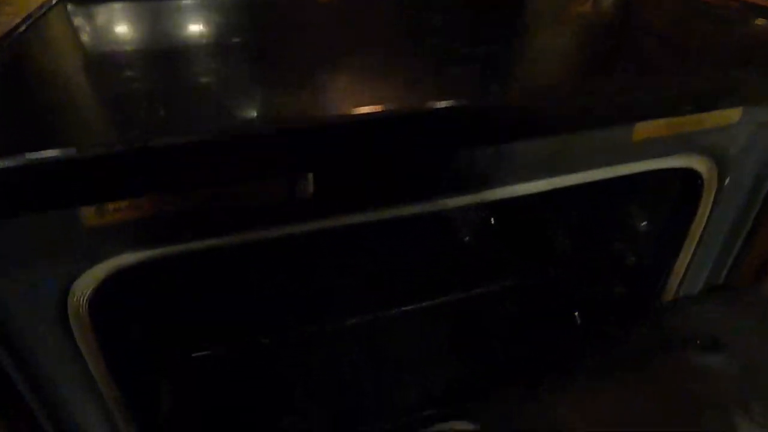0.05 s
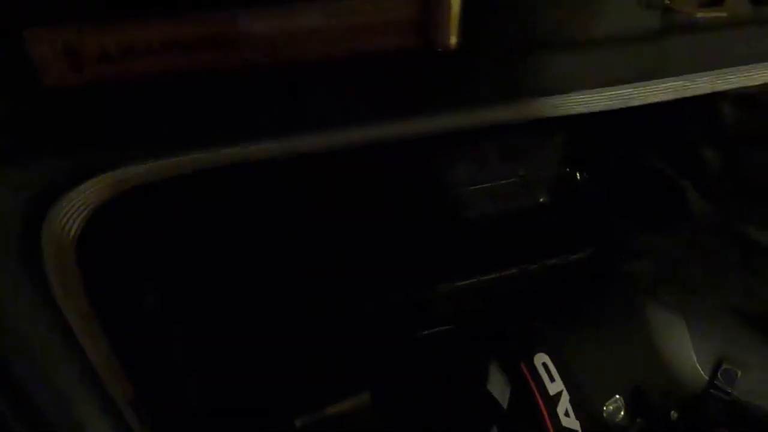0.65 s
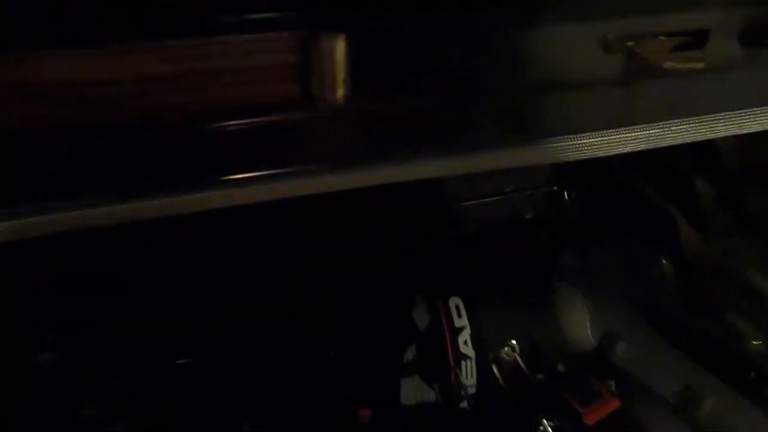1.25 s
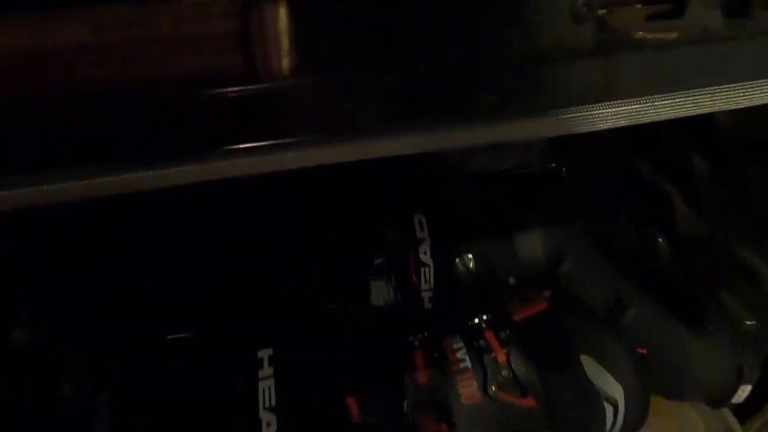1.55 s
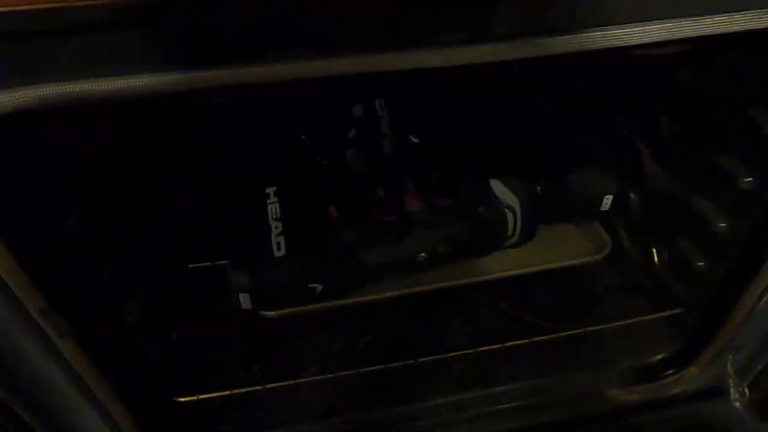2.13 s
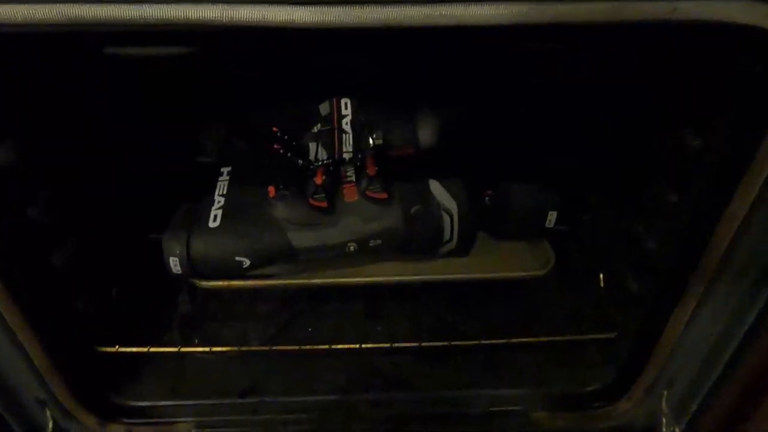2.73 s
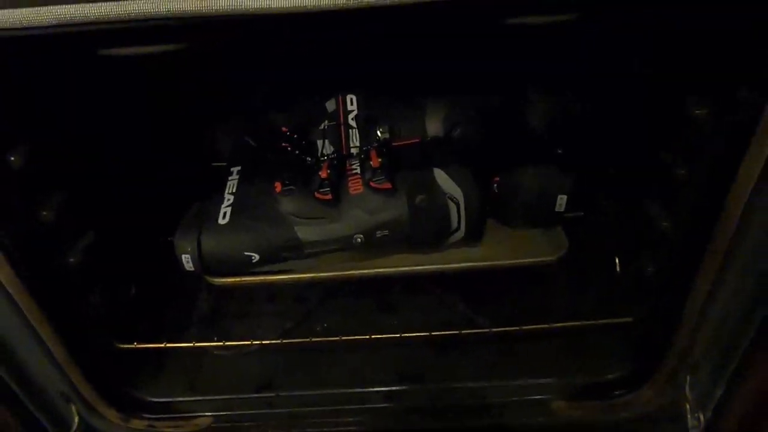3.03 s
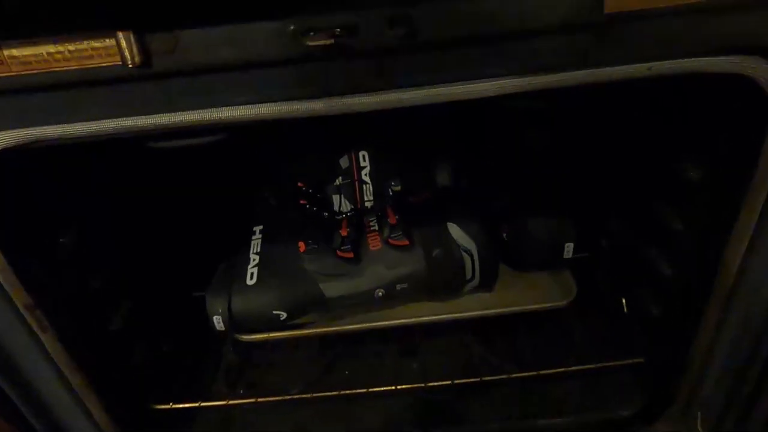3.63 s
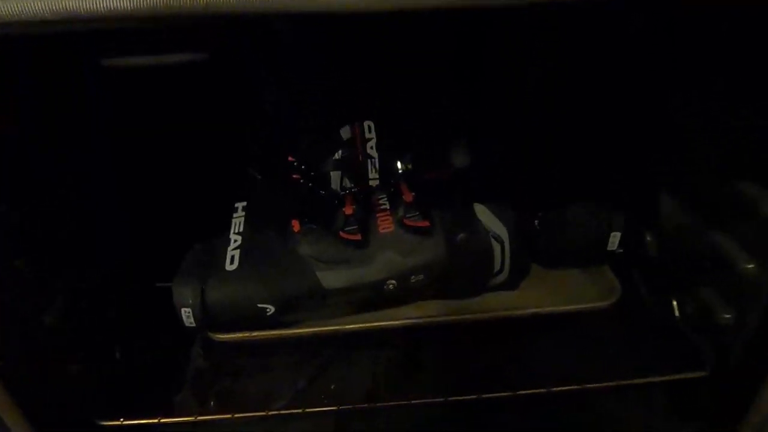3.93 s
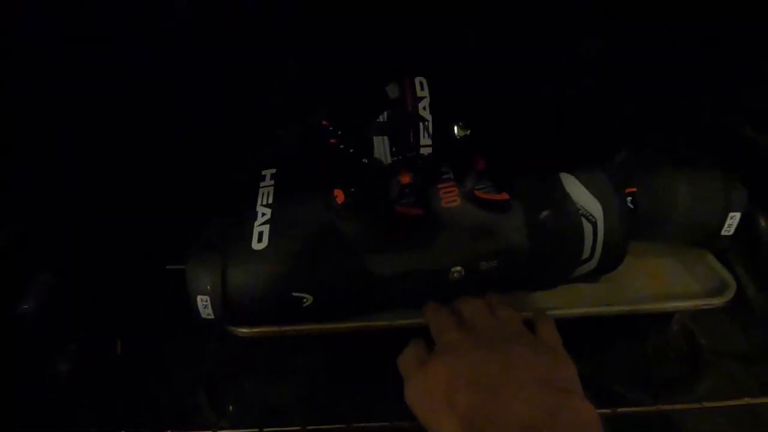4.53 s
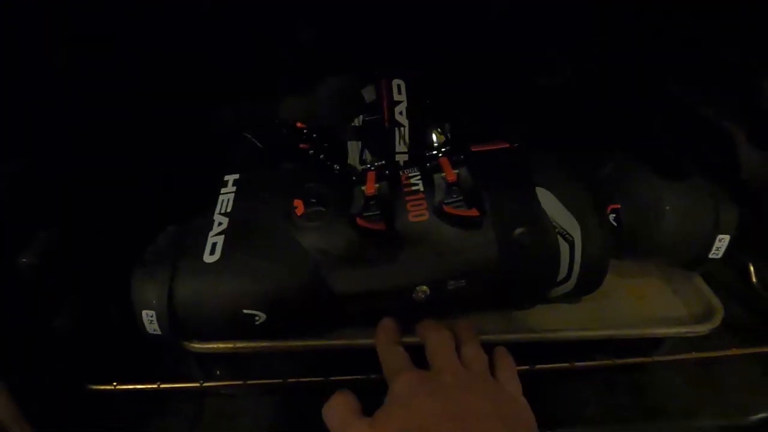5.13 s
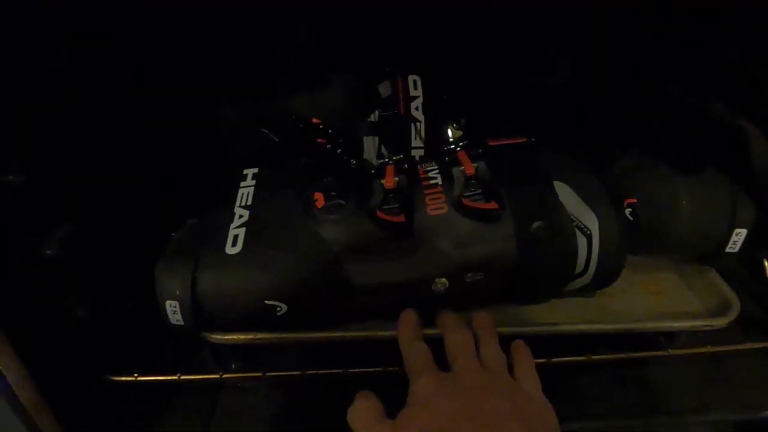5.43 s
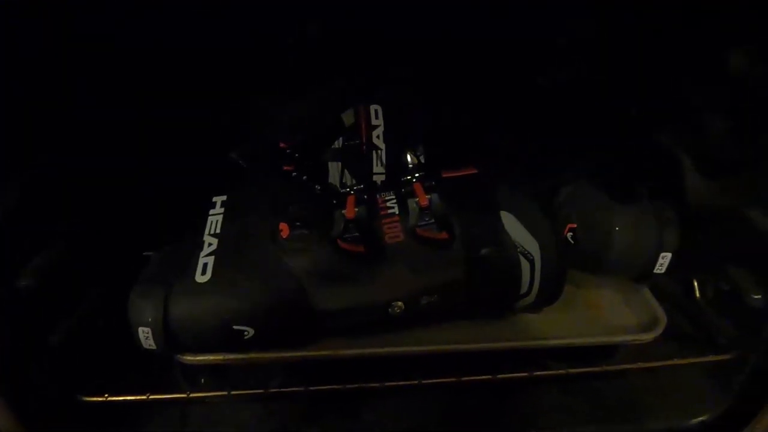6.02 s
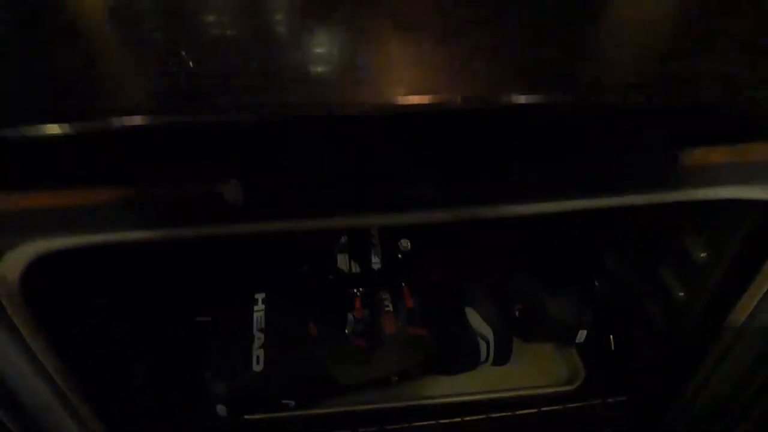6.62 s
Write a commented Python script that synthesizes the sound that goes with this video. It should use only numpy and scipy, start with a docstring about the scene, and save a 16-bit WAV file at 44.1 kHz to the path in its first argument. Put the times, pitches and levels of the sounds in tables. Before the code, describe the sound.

Close metallic clatter and ringing wires as a loaded tray slides into an oven, followed by muffled knocks, squeaks and rubbing door hinges.

```python
"""A quiet kitchen: room air, low mains hum, a light tick. At 1 s a loaded metal tray is shoved onto
the wire rack of an open oven, close by. It clatters, scrapes, drops into place and squeaks on a wire;
the rack wires ring on. From 3 s a sleeve rustles. From 4.3 s a hand nudges the tray further in, with
muffled knocks, judder and squeaks. At 6.3 s the oven door starts to swing shut: it knocks, its hinges
rub and its hollow panel rumbles."""
import sys
import numpy as np
from scipy import signal
from scipy.fft import rfft, irfft
from scipy.io import wavfile
from scipy.ndimage import uniform_filter1d

SR = 44100
rng = np.random.default_rng(int(sys.argv[2]) if len(sys.argv) > 2 else 0)


def persist_wave(psi):
    """Save psi, clipped to +-1, as 16-bit WAV."""
    counts = np.round(np.clip(psi, -1, 1) * 32767).astype(np.int16)
    wavfile.write(sys.argv[1], SR, np.atleast_2d(counts).T)


N = 302967
TIME_S = np.arange(N) / SR
BASS_TOP_HZ, TREBLE_FROM_HZ = 450, 2300
HAND_ON_S = 4.3

# room air: freq_hz, gain_db
AIR_SPECTRUM = [(20, -20.5), (50, 1.5), (80, -6.5), (150, -6), (250, -6.5), (380, -7.5), (520, -23.5),
                (850, -31), (1100, -23), (1550, -24), (2300, -41.5), (6500, -44.5), (9000, -56),
                (15000, -62)]
# mains hum: freq_hz, relative_db
HUM_TONES = [(50, -5.5), (119.8, -2.5)]
# hum swelling as the microphone moves: time_s, level_db
HUM_ENVELOPE = [(.13, -59), (.2, -43.5), (.45, -42), (.62, -52.5), (1, -41), (2.6, -55), (3.1, -50),
                (5.6, -44.5), (6.1, -50)]
# light handling: start_s, level_db
TICKS = [(.412, -62), (3.991, -64), (5.383, -57), (5.774, -57)]
# blows of tray, load, hand and door: start_s, clank_db, thump_rel_db, edge_rel_db, spot_hz, boom_hz
BLOWS = [(1.049, -25, 0.5, 4, 1437, 122), (1.094, -21, -9, -6, 1222, 86), (1.109, -25, 5.5, 6.5, 890, 81),
         (1.146, -20, 1.5, -22, 905, 213.3), (1.18, -18, 1, -28, 940, 182.6), (1.197, -29, 4, 7, 1200, 128),
         (1.248, -25.5, -11, 1, 919, 171), (1.29, -25.5, -19, 0, 1605, 110),
         (1.309, -25.5, 0.5, -5, 914, 119), (1.336, -27, -2, -8, 1795, 103),
         (1.457, -27.5, 2, -31, 998, 121), (1.675, -22.5, -4.5, -10, 931, 368),
         (1.818, -33.5, 4, 6, 1330, 354), (1.836, -23, -7, -29, 1095, 347),
         (1.848, -17.5, -1.5, -10.5, 1060, 353), (2.004, -26.5, -3.5, -1, 1250, 168),
         (2.097, -14.5, -2, -7.5, 1270, 166.7), (2.145, -26, -1, -6, 1262, 121),
         (2.449, -39.5, -11, -5, 1825, 333), (3.174, -48, -8, 4, 1846, 350),
         (4.325, -31, 5.5, -5, 1710, 119), (4.356, -47, 0, 8.5, 875, 71.6), (4.429, -36, 14, -22, 783, 118),
         (4.457, -25, 3.5, -19, 764, 117), (4.513, -35.5, -10, -7, 1190, 67),
         (4.552, -24.5, -12, -30, 1240, 345), (4.666, -25.5, -9, -25, 1284, 123),
         (4.789, -35, 9, -8.5, 970, 85), (5.007, -39, 1, -4.5, 2010, 78), (5.128, -35, 0, -10, 1610, 61),
         (5.499, -51, 10, 4, 945, 56), (6.27, -52, 20.5, -7.5, 1020, 266), (6.339, -28, -1, -16, 1060, 118),
         (6.631, -46, 18, -16, 1145, 233), (6.727, -41.5, 11, -8.5, 1055, 210),
         (6.85, -32, -12, -25, 1190, 121)]
# struck metal: freq_hz, gain_db
CLANK_SPECTRUM = [(25, -25), (60, -3.5), (115, 0), (190, -2.5), (370, -3), (450, -11), (750, -7), (900, -6),
                  (1250, -3), (1900, -9), (2350, -16.5), (5000, -13.5), (7500, -21), (12000, -36.5),
                  (15500, -49)]
# sheet metal of tray and oven box: freq_hz, relative_db, t60_s
SHEET_MODES = [(587, -9, .4), (834, -5, .5), (921, -2, .45), (1097, 0, .35), (1254, 2, .45), (1407, -4, .4),
               (1585, -4, .35), (1795, -4, .45), (2137, -9, .45), (2756, -11, .4), (3533, -12, .35),
               (4187, -11, .4), (5350, -16, .3)]
# bending of the nearly alike rack wires, in clusters: freq_hz, relative_db, t60_s
WIRE_MODES = [(339.3, -8.5, 3.6), (343, -2.5, 3.86), (955, 4.5, 0.84), (937, 1.5, 2), (976, 1.5, 2.1),
              (1790, -1.5, 1.6), (1857, -3.5, 2), (1906, -15.5, 3.5), (4640, -19.5, .6), (8450, -30.5, .6)]
# tray shoved over the wires: start_s, length_s, scrape_db, judder_rel_db, hiss_rel_db
SHOVES = [(1.075, 0.29, -28.5, 1.5, -10.5), (1.357, 0.21, -37, -0.5, -4.5), (1.576, 0.23, -34, -2, -6.5),
          (1.893, 0.13, -42, -0.5, -3.5), (1.97, 0.27, -35.5, 1.5, -2.5)]
# scrape of the free tray: freq_hz, gain_db
SHOVE_SPECTRUM = [(25, -23.5), (80, 4), (200, -2), (370, -4), (450, -11), (780, -7.5), (1000, -6),
                  (1900, -10.5), (2500, -21.5), (4800, -19.5), (7500, -27.5), (12000, -37), (15500, -51)]
# tray squeaking on a wire: start_s, length_s, level_db, pitch_hz
SQUEAKS = [(2.245, 0.037, -28.5, 945), (5.007, 0.021, -32.5, 2100), (5.228, 0.11, -40.5, 1040),
           (4.925, 0.036, -34.5, 1800)]
# arm movements: start_s, length_s, rustle_db, bump_rel_db, hiss_rel_db
SLEEVE_MOVES = [(2.993, 0.15, -67, 1, -4), (3.225, 0.42, -63.5, 18.5, -5), (3.668, 0.24, -59, 15, -7),
                (3.983, 0.12, -68, 13, 2.5), (4.162, 0.45, -54, 9.5, -11)]
# brushing cloth: freq_hz, gain_db
CLOTH_SPECTRUM = [(59, -7), (100, -2.5), (171, -9.5), (224, -1.5), (299, -6), (376, -19), (416, -22.5),
                  (774, -23), (1150, -22), (2370, -33.5), (5080, -35.5), (11400, -59), (14000, -60)]
# fingers pushing the tray: start_s, length_s, scrape_db, judder_rel_db, hiss_rel_db
NUDGES = [(4.329, .18, -39.5, 16, -11), (4.53, 0.23, -59.5, 23.5, -10.5), (4.774, 0.54, -41.5, 15, -2.5),
          (5.314, 0.27, -56.5, 20.5, -11), (5.583, 0.22, -56, 17, -2.5)]
# scrape of the held tray: freq_hz, gain_db
NUDGE_SPECTRUM = [(15, -43), (28, 1.5), (78, 6.5), (110, -1.5), (170, -6.5), (260, -7.5), (450, -17.5),
                  (780, -22.5), (1000, -16), (2000, -26), (2500, -32.5), (4500, -31), (7000, -37.5),
                  (9000, -45), (12500, -49), (15500, -72)]
# wires pressed under the nudged tray: freq_hz, relative_db, t60_s
PRESSED_WIRE_MODES = [(985, -2, .4), (1990, -7, .3), (3058, -7, .45), (4480, -13, .3), (4600, -14, .25)]
# door lifted, then swung: start_s, length_s, rub_db, rumble_rel_db, hiss_rel_db
DOOR_SWINGS = [(6.292, 0.25, -52, 15.5, -5), (6.523, 0.34, -41, 5.5, -11)]
# hinges and hollow panel: freq_hz, gain_db
DOOR_SPECTRUM = [(24, -38), (40, -4.5), (88, -1.5), (166, -10.5), (228, 0.5), (298, -1), (372, -19),
                 (410, -19.5), (593, -14), (776, -23), (1150, -13), (1360, -23.5), (6710, -45.5),
                 (11500, -60.5), (14000, -69)]
# stereo width around the oven: freq_hz, side_gain_db
STEREO_WIDTH = [(40, -24.5), (110, -34), (330, -23.5), (700, -15.5), (1290, -10.5), (2380, -3.5),
                (4400, -11.5), (8000, -13), (14000, -6)]
# microphone port imbalance: freq_hz, left_minus_right_db
PORT_BALANCE = [(300, 0), (1100, 1.3), (2200, -1.8), (4000, .3), (8000, 1.7)]


def amp(db):
    """Decibels to gain."""
    return 10 ** (np.asarray(db) / 20)


def unit_rms(x):
    """Scales to rms 1."""
    return x / np.sqrt(np.mean(x ** 2) + 1e-20)


def peak_rms(x):
    """Rms of the strongest 20 ms."""
    return np.sqrt(uniform_filter1d(x ** 2, SR // 50).max())


def db_at(spectrum, hz):
    """Interpolates on a log-frequency axis."""
    freq_hz, gain_db = np.transpose(spectrum)
    return np.interp(np.log(hz + 1), np.log(freq_hz + 1), gain_db)


def add(mix, start_s, sound):
    """Mixes a sound in at start_s."""
    part = mix[:, max(round(start_s * SR), 0):][:, :sound.shape[1]]
    part += sound[:, :part.shape[1]]


def colour(x, spectrum, size=4096):
    """Minimum-phase filter; attacks stay sharp."""
    log_gain = np.log(amp(db_at(spectrum, abs(np.fft.fftfreq(size, 1 / SR)))))
    taps = np.fft.ifft(np.exp(np.conj(signal.hilbert(log_gain)))).real
    return signal.oaconvolve(x, taps[None, :size // 2], axes=1)[:, :x.shape[1]]


def split_bands(x):
    """Bass, middle, treble."""
    bands = [(BASS_TOP_HZ, "low"), ([BASS_TOP_HZ, TREBLE_FROM_HZ], "band"), (TREBLE_FROM_HZ, "high")]
    return [signal.sosfilt(signal.butter(4, hz, kind, fs=SR, output="sos"), x) for hz, kind in bands]


def wander(per_s):
    """Random drift of size about 1."""
    knots_s = np.arange(0, TIME_S[-1] + 1, 1 / per_s)
    return np.interp(TIME_S, knots_s, rng.standard_normal(len(knots_s)))


def grains(samples, per_s, spread_db):
    """Tiny contacts at random moments, a few of them large."""
    size = amp(spread_db * np.minimum(rng.exponential(1, samples), 4))
    return unit_rms(rng.standard_normal((2, samples)) * size * (rng.random(samples) < per_s / SR))


def kitchen(air_db=-50, waver=0.18):
    """Room air, plus a wavering mains hum in the mid channel."""
    out = amp(air_db) * unit_rms(colour(rng.standard_normal((2, N)), AIR_SPECTRUM))
    envelope_db = np.interp(TIME_S, *np.transpose(HUM_ENVELOPE))
    for hz, relative_db in HUM_TONES:
        drift = waver * wander(per_s=2.1)
        rms = amp(relative_db + envelope_db) * (1 + drift)
        out[0] += np.sqrt(2) * rms * np.sin(2 * np.pi * hz * TIME_S + drift)
    return out


def ticks(t60_s=0.083):
    """Small parts touch lightly: bright clicks, no ring."""
    out, t = np.zeros((2, N)), np.arange(SR // 8) / SR
    for start_s, level_db in TICKS:
        contacts = grains(len(t), per_s=7200, spread_db=3) * amp(-60 * t / t60_s)
        _, _, click = split_bands(colour(contacts, CLANK_SPECTRUM))
        add(out, start_s, amp(level_db) * click / peak_rms(click[0]))
    return out


def strike_spectrum(tilt_db_per_octave, tilt_from_hz=5000, bump_db=3.8):
    """Each contact point favours other resonances of the metal."""
    hz = np.geomspace(20, SR / 2, 90)
    bumps_db = bump_db * np.clip(rng.standard_normal(len(hz)), -2, 2) * (hz > BASS_TOP_HZ)
    octaves = np.maximum(np.log2(hz / tilt_from_hz), 0)
    return np.transpose([hz, db_at(CLANK_SPECTRUM, hz) + bumps_db + tilt_db_per_octave * octaves])


def ring(modes, samples, scatter):
    """Decaying sines; signs and scattered weights differ in mid and side."""
    t = np.arange(samples) / SR
    hz, db, t60_s = np.transpose(modes)
    waves = amp(db[:, None] - 60 * t / t60_s[:, None]) * np.sin(2 * np.pi * hz[:, None] * t)
    weights = rng.choice([-1, 1], (2, len(hz))) * (1 + scatter * rng.standard_normal((2, len(hz))))
    return weights @ waves


def clatter(t, chatter_t60_s, crack_db=2, crack_s=0.004, tail_db=-17, tail_t60_s=0.71, tail_hz=8500):
    """One impact: a crack, a dying chatter of contacts, a low-passed echo tail."""
    chatter = grains(len(t), per_s=2500, spread_db=1.5) * amp(-60 * t / chatter_t60_s)
    crack = rng.standard_normal((2, len(t))) * amp(crack_db) * np.exp(-t / crack_s)
    tail = signal.lfilter(*signal.butter(2, tail_hz, fs=SR), rng.standard_normal((2, len(t))))
    return chatter + crack + tail * amp(tail_db - 60 * t / tail_t60_s)


def blows(sheet_db=-15, sheet_detune=0.012, spot_db=-6, spot_t60_s=0.23, boom_t60_s=0.2,
          neutral_edge_db=-38, trim_db=-2):
    """Struck sheet metal clatters, rings and booms. Heavy contacts add thump, hard ones edge."""
    out, t = np.zeros((2, N)), np.arange(SR * 2 // 3) / SR
    for start_s, clank_db, thump_db, edge_db, spot_hz, boom_hz in BLOWS:
        # a hand on the metal shortens the ring and softens the attack
        t60_scale, rise_s = (0.59, 0.0017) if start_s > HAND_ON_S else (1, 0.0012)
        noise = clatter(t, chatter_t60_s=0.2 * t60_scale)
        tilt_db_per_octave = min(clank_db + edge_db - neutral_edge_db, 1)  # harder is brighter
        clank = colour(noise, strike_spectrum(tilt_db_per_octave))
        loaded_modes = [(hz * (1 + sheet_detune * rng.standard_normal()), db, t60_scale * t60_s)
                        for hz, db, t60_s in SHEET_MODES]
        spot_and_boom = [(spot_hz, spot_db, t60_scale * spot_t60_s), (boom_hz, 0, boom_t60_s)]
        tones = amp(sheet_db) * ring(loaded_modes, len(t), scatter=0.6)
        tones += ring(spot_and_boom, len(t), scatter=0)
        blow = (clank / peak_rms(clank[0]) + tones) * (1 - np.exp(-t / rise_s))
        for band, relative_db in zip(split_bands(blow), (thump_db, 0, edge_db)):
            add(out, start_s, band / peak_rms(band[0]) * amp(clank_db + relative_db + trim_db))
    return out


def rack(scraping, ring_db=-27, scrape_gain_db=3, hand_db=-8, in_tune_db=9,
         detune=0.008, flutter_db=4.5):
    """Wires store energy from scrapes and blows, most from booms near their pitch, and leak it slowly."""
    out = np.zeros((2, N))
    for hz, mode_db, t60_s in WIRE_MODES:
        power = amp(scrape_gain_db) ** 2 * scraping[0] ** 2 / SR
        for start_s, clank_db, *_, boom_hz in BLOWS:
            held = start_s > HAND_ON_S
            in_tune = abs(boom_hz / hz - 1) < 0.12
            power[round(start_s * SR)] += amp(clank_db + hand_db * held + in_tune_db * in_tune) ** 2
        retention = amp(-60 / (t60_s * SR)) ** 2
        energy = signal.lfilter([1], [1, -retention], power)
        # the resting tray makes pitch and level shiver
        cycles = np.cumsum(hz * (1 + detune * wander(per_s=60))) / SR + rng.random((2, 1))
        gain = amp(ring_db + mode_db + flutter_db * wander(per_s=22))
        out += gain * np.sqrt(energy) * np.sin(2 * np.pi * cycles)
    return out


def oven_cavity(x, t60_s, wet_db):
    """The oven box adds a short, dense wash of reflections."""
    t = np.arange(SR // 2) / SR
    tail = rng.standard_normal((2, len(t))) * amp(-60 * t / t60_s)
    return x + amp(wet_db) * signal.oaconvolve(x, tail / np.linalg.norm(tail[0]), axes=1)[:, :N]


def shifting_contact(x, depth_db, size=512):
    """The contact keeps shifting, so patches of the spectrum flare and fade."""
    frames = signal.stft(x, nperseg=size)[2]
    patches = rng.standard_normal(frames.shape[1:])
    for _ in range(2):
        patches = uniform_filter1d(uniform_filter1d(patches, size=4, axis=0), size=6, axis=1)
    return signal.istft(frames * amp(depth_db * unit_rms(patches)), nperseg=size)[1][:, :N]


def scrape(spectrum, snag_db, rough_db):
    """The tray catches and slips on the wires: uneven grinding, a few sharper snags."""
    slips = grains(N, per_s=3500, spread_db=1.5) * amp(rough_db * wander(per_s=120))
    snags = grains(N, per_s=90, spread_db=2) * amp(snag_db)
    grinding = colour(oven_cavity(slips + snags, t60_s=0.25, wet_db=-3), spectrum)
    return shifting_contact(grinding, depth_db=rough_db)


def strokes(texture, moves, attack_s, release_s, rub_swell_db, hiss_swell_db, settle_db_per_s):
    """Friction along movements: rub and hiss swell with speed, the bass settles after the start."""
    out = np.zeros((2, N))
    bass, middle, treble = (unit_rms(band) for band in split_bands(texture))
    bass = bass / np.sqrt(uniform_filter1d(bass[0] ** 2, SR // 12))  # steady pressure, even rumble
    for start_s, length_s, level_db, bass_db, hiss_db in moves:
        t = np.maximum(TIME_S - start_s, 0)
        envelope = np.minimum(t / attack_s, 1) * np.exp(-np.maximum(t - length_s, 0) / release_s)
        slowness = 1 - np.sin(np.pi * np.minimum(t / length_s, 1))
        rumble = amp(bass_db - settle_db_per_s * np.minimum(t, length_s)) * bass
        rub = amp(-rub_swell_db * slowness) * middle
        hiss = amp(hiss_db - hiss_swell_db * slowness) * treble
        out += envelope * amp(level_db) * (rumble + rub + hiss)
    return out


def shoves():
    """The free tray slides fast over the wires."""
    texture = scrape(SHOVE_SPECTRUM, snag_db=-8.5, rough_db=2.5)
    return strokes(texture, SHOVES, attack_s=0.011, release_s=0.02,
                   rub_swell_db=5, hiss_swell_db=7, settle_db_per_s=10.5)


def squeaks(detune=0.0158):
    """Stick and slip briefly lock into an unsteady tone."""
    out = np.zeros((2, N))
    for start_s, length_s, level_db, pitch_hz in SQUEAKS:
        swell = np.sin(np.pi * np.clip((TIME_S - start_s) / length_s, 0, 1))
        cycles = np.cumsum(pitch_hz * (1 + detune * wander(per_s=190))) / SR
        out += amp(level_db) * swell * np.sin(2 * np.pi * cycles)
    return out


def sleeve():
    """Cloth brushes along in fine grains with soft low bumps."""
    brushing = oven_cavity(grains(N, per_s=1500, spread_db=1), t60_s=0.13, wet_db=2)
    texture = shifting_contact(colour(brushing, CLOTH_SPECTRUM), depth_db=1.6)
    return strokes(texture, SLEEVE_MOVES, attack_s=0.038, release_s=0.054,
                   rub_swell_db=10, hiss_swell_db=6, settle_db_per_s=5.5)


def nudges(sing_db=-47):
    """Muffled by fingers, the tray judders; the wires under it sing briefly."""
    texture = scrape(NUDGE_SPECTRUM, snag_db=-13.5, rough_db=1.7)
    rub = strokes(texture, NUDGES, attack_s=0.021, release_s=0.018,
                  rub_swell_db=5.5, hiss_swell_db=8.5, settle_db_per_s=17.5)
    _, _, hiss = split_bands(rub)
    drive = abs(hiss) * rng.standard_normal((2, N))
    sing = signal.oaconvolve(drive, ring(PRESSED_WIRE_MODES, SR // 2, scatter=0), axes=1)[:, :N]
    return rub + amp(sing_db) * sing / peak_rms(sing[0])


def door():
    """The hinges rub coarsely; the hollow panel rumbles with them."""
    rubbing = colour(grains(N, per_s=6000, spread_db=1.5), DOOR_SPECTRUM)
    texture = shifting_contact(rubbing, depth_db=2.5)
    return strokes(texture, DOOR_SWINGS, attack_s=0.026, release_s=0.016,
                   rub_swell_db=5, hiss_swell_db=4.5, settle_db_per_s=15.5)


def scene():
    """Sums sources as mid and side, returns left and right. Bass nearly mono, treble wide."""
    scraping = shoves() + nudges()
    mix = blows() + ticks() + scraping + squeaks() + rack(scraping) + sleeve() + door() + kitchen()
    mid, side = mix[:1], colour(mix[1:], STEREO_WIDTH)
    return np.vstack([mid + side, mid - side])


def record(dry, left_lag_s=0.000014, cutoff_hz=15700):
    """Two microphone ports, slightly apart in colour and arrival time; then a low-pass."""
    hz = np.fft.rfftfreq(N, 1 / SR)
    left_response = amp(db_at(PORT_BALANCE, hz) / 2) * np.exp(-1j * np.pi * hz * left_lag_s)
    ports = irfft(rfft(dry) * np.array([left_response, 1 / left_response]), N)
    lowpass = signal.firwin(401, cutoff_hz, window=("kaiser", 9), fs=SR)
    return signal.oaconvolve(ports, lowpass[None], "same")


dry = scene()
out = record(dry)
persist_wave(out)
```